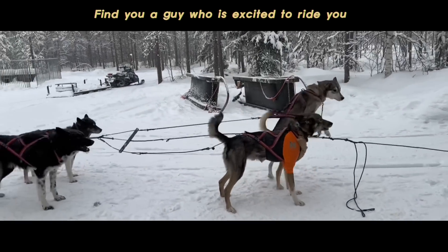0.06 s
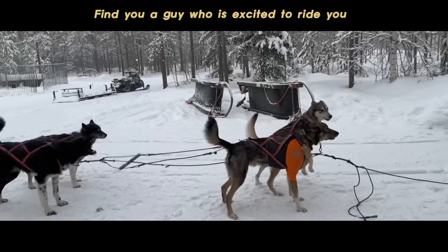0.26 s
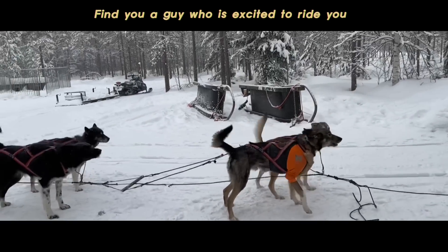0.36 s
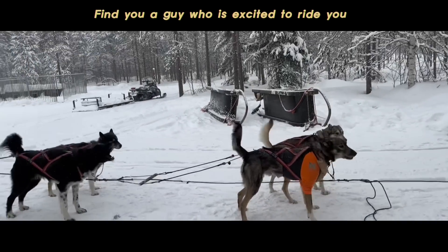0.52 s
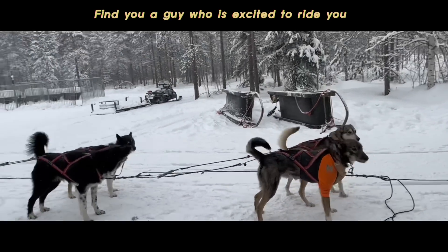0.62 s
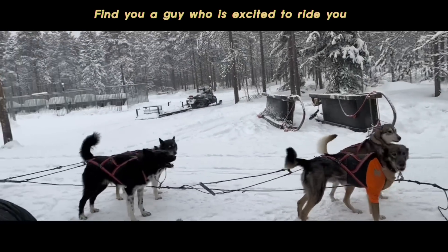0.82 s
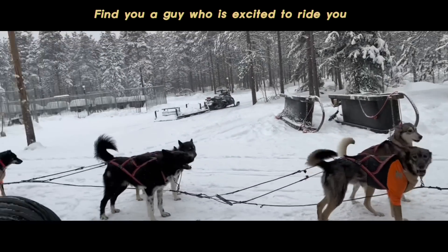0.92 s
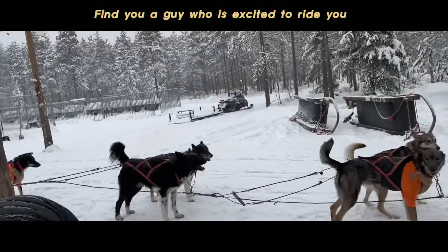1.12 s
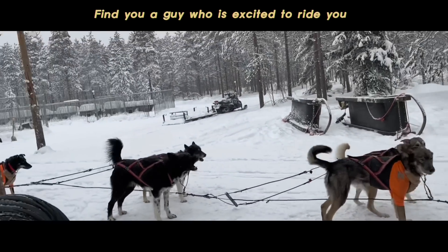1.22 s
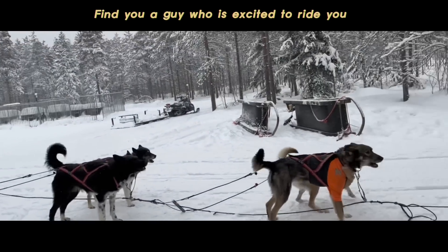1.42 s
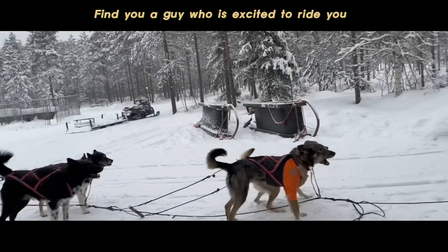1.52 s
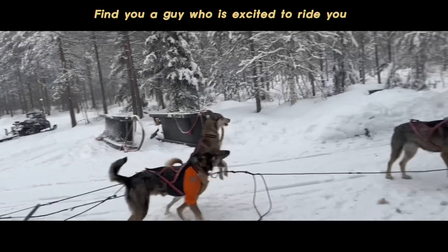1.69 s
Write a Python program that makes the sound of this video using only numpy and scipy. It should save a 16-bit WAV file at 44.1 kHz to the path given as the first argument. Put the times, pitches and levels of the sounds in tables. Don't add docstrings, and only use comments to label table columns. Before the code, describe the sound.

A close dog gives two quick cracking yelps and a third later, while other dogs whine high and thin; faint far pack murmur, soft paw steps, open snowy forest edge, stereo handheld microphone.

```python
import sys
import numpy as np
from scipy import signal
from scipy.fft import rfft, irfft
from scipy.io import wavfile
from scipy.ndimage import uniform_filter1d

SR = 44100
rng = np.random.default_rng(int(sys.argv[2]) if len(sys.argv) > 2 else 0)


def persist_wave(psi):
    counts = np.round(np.clip(psi, -1, 1) * 32767).astype(np.int16)
    wavfile.write(sys.argv[1], SR, np.atleast_2d(counts).T)


def how_loud(loudness_db):
    steps = np.asarray(loudness_db, float) / 20
    return 10 ** steps


N = 77175
T = np.arange(N) / SR

# [t/s, f/Hz, level/dB, roughness 0-1]
YELP_PARTS = [
    [(0, 664, -12, 0.18), (.006, 741, -17, 0), (.014, 638, -37.5, 1.02), (.04, 687, -40.5, 0.6)],
    [(.176, 340, -48.5, .4), (.186, 420, -40, .4), (.193, 511.6, -34, 0.65), (.203, 582.3, -7.5, 0.04),
     (.213, 587, -3, 0.04), (.224, 587, -3.5, 0.05), (.229, 643, -9, 0.16)],
    [(.234, 957, -20, 1), (.25, 1015, -17.5, 0.9), (.259, 1008, -13.5, 0.43), (.268, 998, -4.5, 0.08),
     (.277, 951, -11.5, 0.36), (.288, 1020, -7, .2), (.296, 1046, -16, 0.3)],
    [(.302, 625, -22.5, 0.77), (.309, 646, -25, 0.7), (.316, 570, -21.5, 0.42), (.325, 585, -32.5, 0.7),
     (.34, 577, -47, .5)],
    [(.43, 420, -45, .2), (.44, 440, -31.5, 0.1), (.448, 462.3, -36.5, 0.57), (.458, 554, -29, 0.5),
     (.47, 600.6, -13, 0.06), (.485, 613, -9.5, 0.02), (.5, 646.6, -11, 0)],
    [(.508, 880, -26.5, 0.22), (.522, 953, -22, 0.2), (.53, 1042, -5.5, 0), (.57, 1067, -8, 0.01),
     (.606, 1091, -10.5, 0), (.613, 999, -19, 0), (.622, 862, -33.5, 0.15), (.63, 625, -22.5, 0.12),
     (.638, 535, -24.5, 0.23)],
    [(1.165, 301.7, -49.5, 0.2), (1.19, 393, -43.5, 0.1), (1.208, 505.6, -35, 0.15), (1.226, 585, -12, 0),
     (1.25, 638, -15.5, 0.12)],
    [(1.257, 902, -33, 0.2), (1.28, 1113, -10.5, 0), (1.302, 1156, -6.5, 0.03), (1.322, 1075, -18, 0),
     (1.333, 792, -34.5, .15), (1.346, 548, -28, 0.25)],
]
TEETH_AIR_DB = [-48, -52.5, -39.5, -46, -53.5, -43, -59, -45.5]
SECOND_HARMONIC_DB = [-14, -5, -4.5, 1, -5.5, 2, -3, 5.5]
# [f/Hz, level/dB]
THROAT_RESONANCES = [(300, -17), (600, 12.5), (850, -10), (1060, 2.5), (1450, -1), (2050, -5),
                     (2680, -30.5), (3100, -23)]
# [t/s, f/Hz, level/dB]
SECOND_FOLD = [(.506, 600, -44), (.55, 659, -46), (.574, 827, -41.5), (.6, 812, -44)]
# [t/s, length/s, fade/s, level/dB]
HISS_EVENTS = [
    (.0, 0.024, 0.013, -55.5),
    (0.241, 0.089, 0.041, -48.5),
    (0.365, 0.068, 0.042, -46.5),
    (0.933, 0.087, 0.13, -45),
    (1.12, .42, .08, -59.5),
]
# [f/Hz, level/dB]
HISS_COLOUR = [(1500, -19.5), (3500, -11.5), (5500, -7.5), (8600, -5.5), (11000, -15.5), (14000, -20),
               (15500, -11), (16000, -14.5)]
# [t/s, length/s, first f/Hz, last f/Hz, level/dB]
PACK_CALLS = [
    (.015, .14, 530, 515, -53),
    (.05, .1, 720, 790, -53),
    (.02, .14, 945, 955, -50),
    (1.44, .11, 390, 490, -52),
    (.375, .055, 420, 560, -50),
    (1.48, .1, 830, 750, -43),
    (1.47, .1, 940, 900, -47),
    (1.62, .13, 740, 780, -48),
    (1.56, .19, 600, 640, -52),
    (1.64, .1, 480, 520, -54),
]
# [t/s, level/dB]
PAW_FALLS = [
    (.03, -50.5),
    (.44, -50),
    (.74, -49.5),
    (1.15, -51),
    (1.45, -55.5),
    (1.63, -49.5),
    (1.7, -55),
]
# [f/Hz, level/dB]
AIR_COLOUR = [(30, -9.5), (60, -3.5), (250, -10), (900, -6.5), (2000, -12), (3300, -18.5), (6100, -18),
              (11000, -27)]
# [t/s, f/Hz, level/dB]
WHISTLE_PATH = [(.44, 5845, -58), (.5, 5510, -52), (.54, 5300, -44.5), (.58, 5200, -69.5), (.66, 4987, -74),
                (.72, 5195, -65.5), (.78, 5400, -54), (.81, 5556, -43), (.845, 5770, -37), (.93, 5666, -35),
                (1.02, 5622, -37.5), (1.05, 5393, -31.5), (1.1, 5357, -39), (1.2, 5406, -58.5),
                (1.3, 5310, -45), (1.6, 5425, -52.5), (1.66, 5505, -45.5), (1.76, 5525, -40.5)]
# [t/s, f/Hz, level/dB]
LOW_VOICE = [
    [(.86, 1103, -39.5), (.9, 1139, -33.5), (.935, 1170, -27), (.96, 1180, -20), (1.02, 1165, -23),
     (1.052, 1200, -28), (1.075, 1234, -41)],
    [(1.45, 1088, -52), (1.49, 1059, -34.5), (1.6, 1087, -34), (1.71, 1050, -28), (1.76, 1055, -31)],
]
LOW_VOICE_HARMONICS = [
    [-3.6, -18, -34, -36, -21, -22.5],
    [-0.84, -19.5, -31.5, -31, -27, -31],
]
MODULATION_RAD = [1, 0.27]
# [t/s, f/Hz, level/dB]
NEIGHBOUR_WHISTLE = [(.6, 5900, -50.5), (.66, 5840, -55.5), (.69, 6000, -61.5), (.73, 5840, -70.5),
                     (.76, 6220, -59), (.775, 6070, -74), (.8, 6150, -41.5), (.84, 6030, -51),
                     (.9, 5990, -55.5)]
# [t/s, f/Hz, level/dB]
WHINE_CALLS = [
    [(.645, 1069, -54.5), (.675, 1062, -55), (.69, 1120, -53.5), (.705, 1135, -45.5), (.73, 1108, -37.5),
     (.755, 1235, -33), (.775, 1185, -33), (.788, 1240, -30.5)],
    [(.797, 1330, -29.5), (.815, 1328, -32), (.845, 1343, -34.5), (.87, 1305, -33.5), (.885, 1230, -41.5),
     (.905, 1160, -31)],
    [(.945, 1267, -26.5), (.962, 1336, -27), (.992, 1277, -27.5), (1.012, 1322, -25.5),
     (1.052, 1301, -24.5), (1.085, 1345, -18.5), (1.175, 1376, -17), (1.335, 1381, -23.5),
     (1.362, 1350, -27)],
    [(1.372, 1405, -38), (1.382, 1425, -45), (1.392, 1400, -40)],
    [(1.403, 1221, -21.5), (1.41, 1302, -16.5), (1.425, 1335, -17.5), (1.445, 1356, -17),
     (1.475, 1325, -19), (1.51, 1325, -19), (1.528, 1360, -28.5), (1.54, 1300, -46), (1.56, 1127, -39)],
]
WHINE_HARMONICS = [
    [-1, -1.5, -17, -21, -23],
    [1.5, -10.5, -22, -37, -22],
    [1, -13, -28, -35.5, -35, -47, -38],
    [3.5, -6, -30],
    [-1.5, -15, -24.5, -36, -39.5, -54, -44],
]
# [f/Hz, level/dB]
MUZZLE_RESPONSE = [(2900, -0.5), (3550, -9), (4050, 1.5), (4700, -5), (5300, -0.5)]
# [f/Hz, phase the left leads/rad, left minus right level/dB]
PORT_DIFFERENCE = [(300, .1, 0), (600, .47, 3), (1340, -.45, 3), (2200, -1.7, 1), (2750, -2.6, 10),
                   (3200, -5, 6), (4200, -7.1, -4), (5500, -5.5, 0), (7000, -6.6, -1), (10800, -8.5, 0),
                   (16000, -9.4, 0)]


def curve(rows, hz):
    rows = np.array(rows, float)
    return np.interp(np.log(np.maximum(hz, 1)), np.log(rows[:, 0]), rows[:, 1])


def walk(rate):
    span = max(int(SR / rate), 1)
    w = uniform_filter1d(uniform_filter1d(rng.standard_normal(N), span), span)
    return w / w.std()


def filtered(x, rows):
    return irfft(rfft(x) * how_loud(curve(rows, np.fft.rfftfreq(N, 1 / SR))), N)


def noise(rows):
    x = filtered(rng.standard_normal(N), rows)
    return x / x.std()


def gate(start, end, edge):
    opening = np.clip((T - start) / edge + 1, 0, 1) ** 2
    closing = np.clip((end - T) / edge + 1, 0, 1) ** 2
    return opening * closing


def folds(rows):
    r = np.array(rows, float).T
    pitch, level, *rest = [uniform_filter1d(np.interp(T, r[0], c), size=200) for c in r[1:]]
    hz = pitch * (1 + .003 * walk(84))
    phase = 2 * np.pi * np.cumsum(hz) / SR
    gain = how_loud(level) * gate(r[0, 0], r[0, -1] + .002, .006)
    return hz, phase, gain, rest


def stack(phase, harmonics_db):
    total = 0
    for k, db in enumerate(harmonics_db):
        flicker = how_loud(db + (.3 + .8 * k) * walk(40))
        blur = .09 * k * walk(250)
        total = total + flicker * np.sin((k + 1) * phase + blur)
    return total


def throat(hz):
    return curve(THROAT_RESONANCES, hz) - 70 * np.log2(np.maximum(hz / THROAT_RESONANCES[-1][0], 1))


def yelp(rows, puff_db, octave_db):
    hz, phase, gain, (rough,) = folds(rows)
    rough = np.clip(rough, 0, 1)
    phase = phase + 1.2 * rough ** 2 * walk(300)
    tone, thirds = 0, 0
    for k in range(1, 6):
        tilt = -5 * np.log2(k) * 1000 / (hz + 300)
        level = throat(k * hz) - throat(hz) + octave_db * (k == 2) + tilt
        tone = tone + how_loud(level) * np.cos(k * phase + k * k / 2)
    for k in (2, 4, 5, 7):
        level = throat(k * hz / 3) / 2 + 3 * walk(150)
        thirds = thirds + how_loud(level) * np.sin(k * phase / 3 + k * k)
    rasp = noise([(150, -70.5)] + THROAT_RESONANCES + [(4500, -59)])
    puff = noise([(2500, -17.5), (8000, 0.5), (16000, -48)])
    flutter = how_loud(3 * rough * walk(200))
    roughness = rough * (how_loud(-10.5) * thirds + how_loud(-1) * rasp)
    return gain * (tone * flutter + roughness + how_loud(puff_db) * puff)


def near_dog():
    yelps = sum(yelp(*part) for part in zip(YELP_PARTS, TEETH_AIR_DB, SECOND_HARMONIC_DB))
    _, phase, gain, _ = folds(SECOND_FOLD)
    return yelps + gain * stack(phase, [0, 8, 4])


def hiss():
    envelope = sum(how_loud(db) * gate(s, s + n, fade) for s, n, fade, db in HISS_EVENTS)
    return envelope * how_loud(2 * walk(160)) * noise(HISS_COLOUR)


def far_pack():
    pack = 0
    for s, n, hz0, hz1, db in PACK_CALLS:
        glide = np.interp(T, [s, s + n], [hz0, hz1])
        phase = 2 * np.pi * np.cumsum(glide) / SR + 1.5 * walk(51)
        voice = np.sin(phase) + how_loud(-20) * np.sin(2 * phase)
        pack = pack + how_loud(db + 3.6 * walk(45)) * gate(s, s + n, 0.023) * voice
    return pack


def paws():
    blows = sum(how_loud(db) * np.exp(-((T - s) / .018) ** 2) for s, db in PAW_FALLS)
    return blows * noise([(30, -8), (110, -0.5), (200, -8.0), (400, -23.5), (1500, -63)])


def still_air():
    return how_loud(-55 + 2 * walk(4.0)) * noise(AIR_COLOUR)


def ground():
    return hiss() + far_pack() + paws() + still_air()


def whistler():
    low, shake = 0, 0
    for rows, beat, db in zip(LOW_VOICE, MODULATION_RAD, LOW_VOICE_HARMONICS):
        _, phase, gain, _ = folds(rows)
        low = low + gain * stack(phase, db)
        shake = shake + beat * gate(rows[1][0], rows[-2][0], 0.01) * np.sin(phase)
    _, phase, gain, _ = folds(WHISTLE_PATH)
    octave = how_loud(-9.5 + 2 * walk(12)) * np.sin(2 * phase + 0.303 * shake)
    return low + gain * (np.sin(phase + shake) + octave)


def far_dogs():
    far = 0
    for rows, db in list(zip(WHINE_CALLS, WHINE_HARMONICS)) + [(NEIGHBOUR_WHISTLE, [0])]:
        _, phase, gain, _ = folds(rows)
        far = far + gain * stack(phase, db)
    return far


def trees(x):
    tail = rng.standard_normal((2, N)) * how_loud(-60 * T / 0.22) * (T > 0.03)
    tail = tail[0] + tail[1] * np.array([[1], [-1]])
    tail = signal.lfilter(*signal.butter(2, [400, 1700], "band", fs=SR), tail)
    tail = tail / np.sqrt(np.sum(tail[0] ** 2))
    return how_loud(-33) * signal.fftconvolve(x[None], tail)[:, :N]


def stray():
    high = signal.lfilter(*signal.butter(3, 1500, "high", fs=SR), ground())
    return how_loud(-6) * high * np.array([[1], [-1]])


def ports(x, pan_db):
    f, p = np.fft.rfftfreq(2 * N, 1 / SR), np.array(PORT_DIFFERENCE)
    level = curve(p[:, ::2], f) + pan_db * np.clip(f / 1000, 0, 1)
    left = how_loud(level / 2) * np.exp(.5j * curve(p, f))
    h = np.array([left, 1 / left])
    h = h / np.maximum(abs(h.mean(axis=0)), .6)
    return irfft(rfft(x, 2 * N) * h)[:, :N]


def scene():
    near, third, far = near_dog(), whistler(), far_dogs()
    beyond = filtered(far + ground(), MUZZLE_RESPONSE)
    direct = ports(near, 0.5) + ports(beyond, 1.35) + ports(third, -0.5)
    return direct + trees(near + far + third) + stray()


def low_pass(x):
    return signal.sosfilt(signal.butter(12, 16130, fs=SR, output="sos"), x)


def record(dry):
    f = np.fft.rfftfreq(N, 1 / SR)
    cancelled = irfft(rfft(dry.mean(axis=0)) * (f > 11500) * (f < 14700), N)
    return low_pass(dry - cancelled)


dry = scene()
out = record(dry)
persist_wave(out)
```